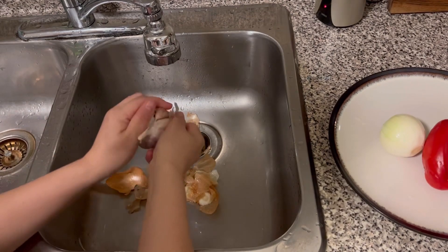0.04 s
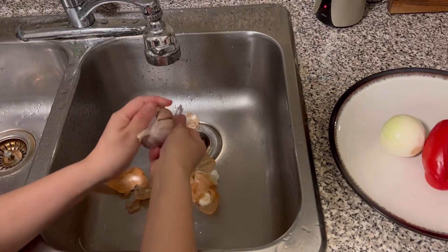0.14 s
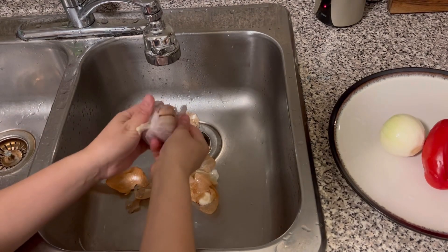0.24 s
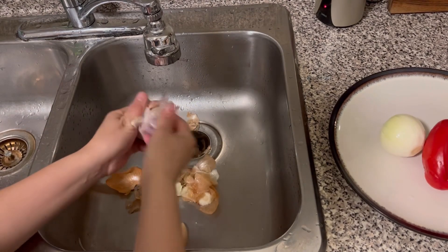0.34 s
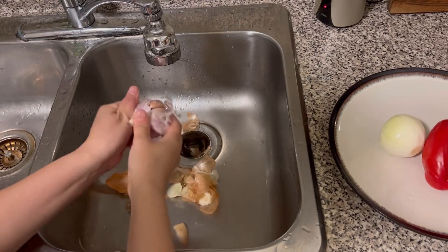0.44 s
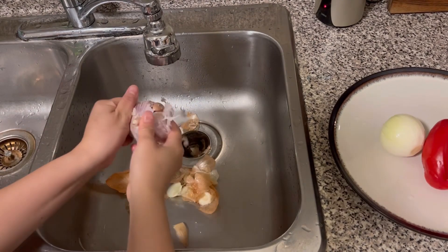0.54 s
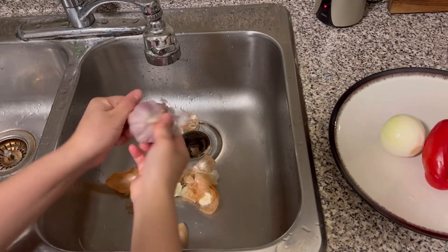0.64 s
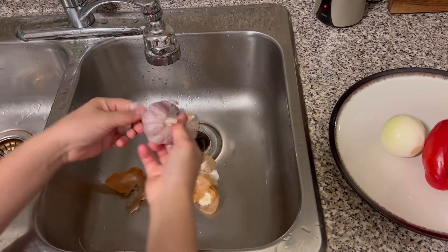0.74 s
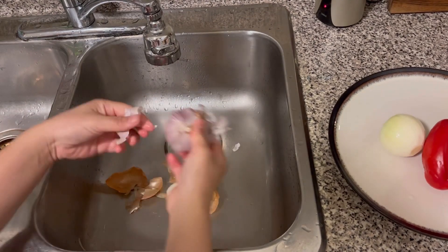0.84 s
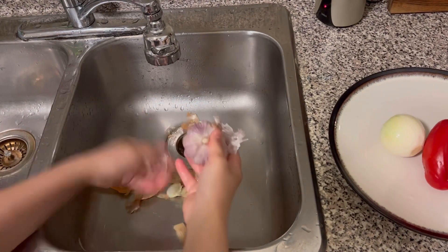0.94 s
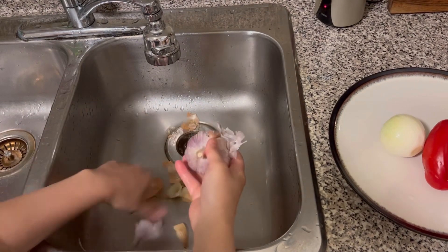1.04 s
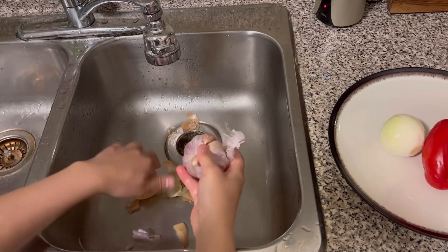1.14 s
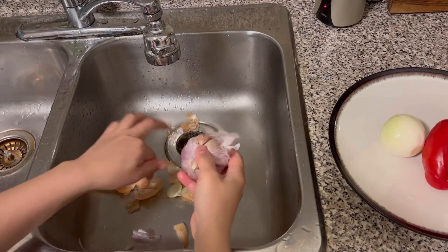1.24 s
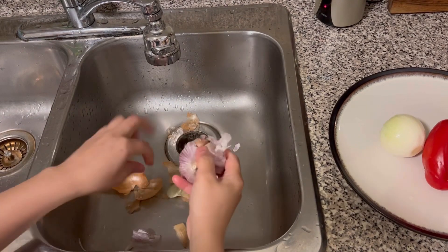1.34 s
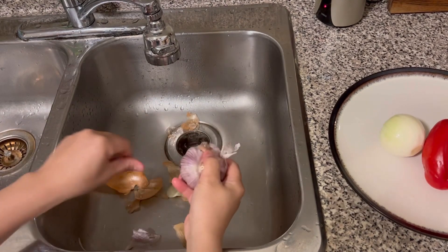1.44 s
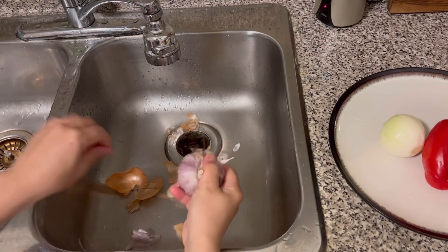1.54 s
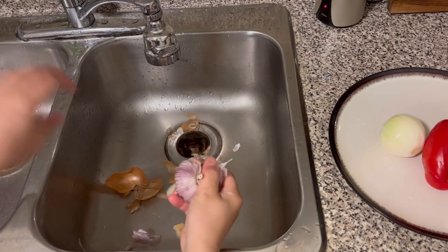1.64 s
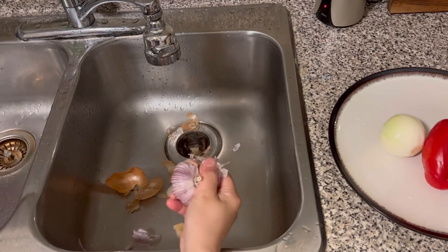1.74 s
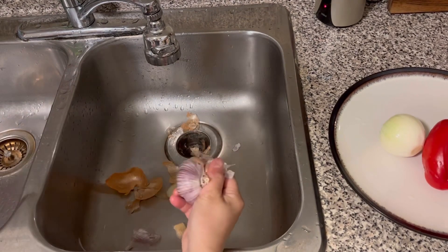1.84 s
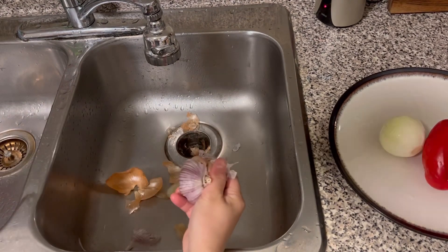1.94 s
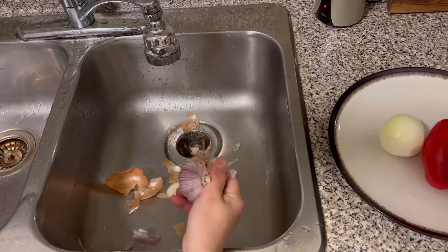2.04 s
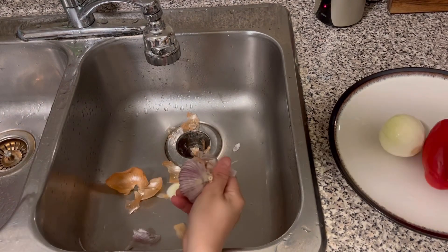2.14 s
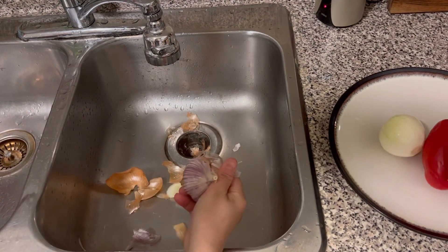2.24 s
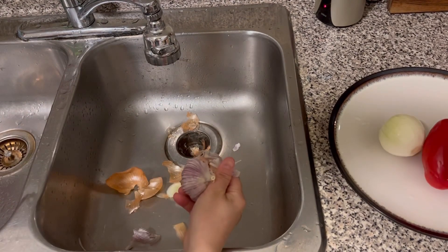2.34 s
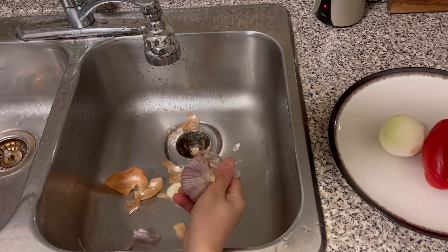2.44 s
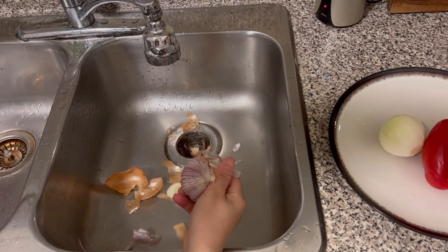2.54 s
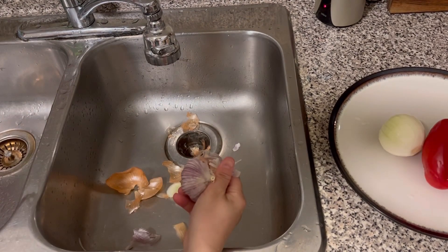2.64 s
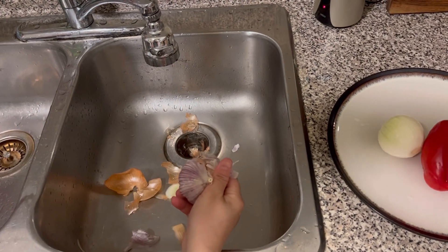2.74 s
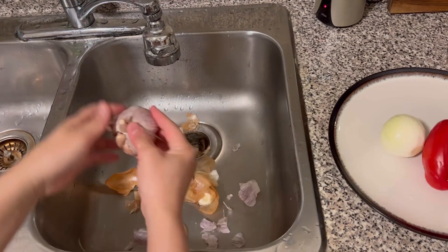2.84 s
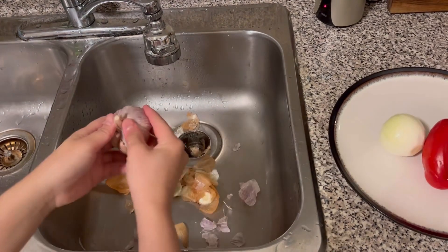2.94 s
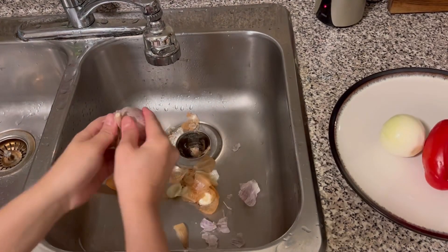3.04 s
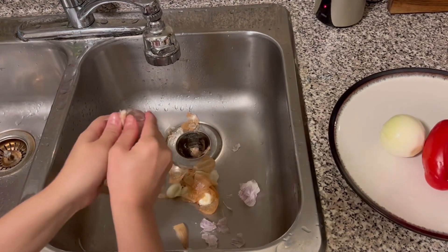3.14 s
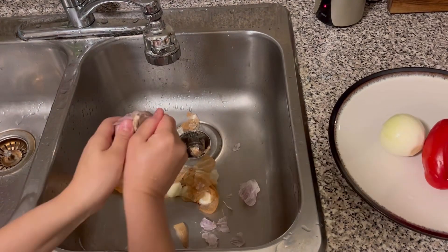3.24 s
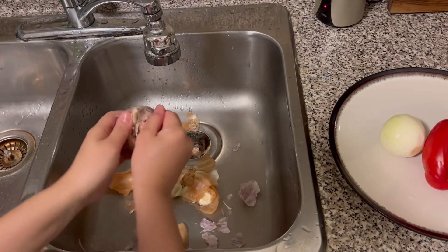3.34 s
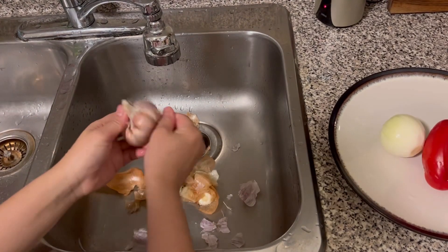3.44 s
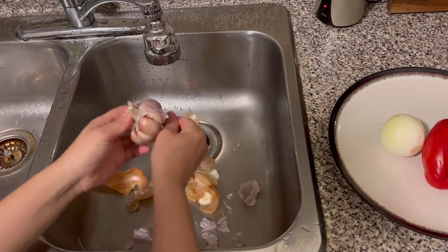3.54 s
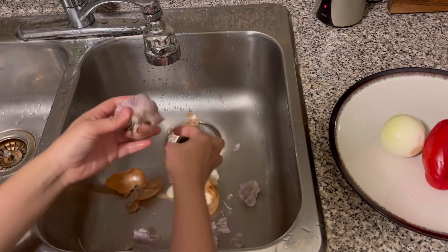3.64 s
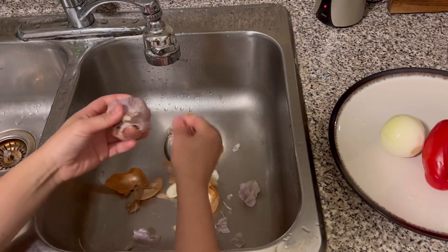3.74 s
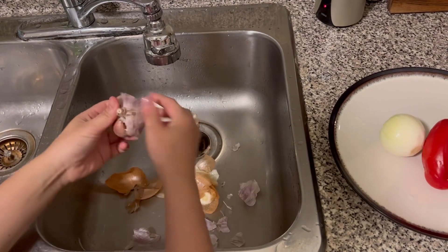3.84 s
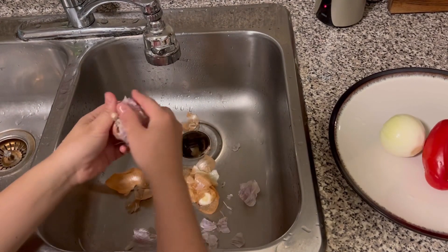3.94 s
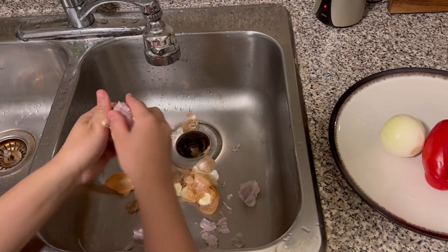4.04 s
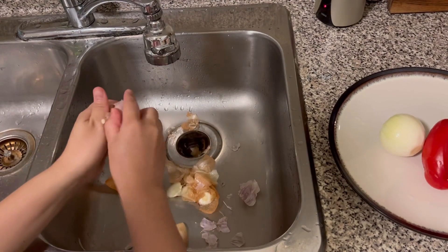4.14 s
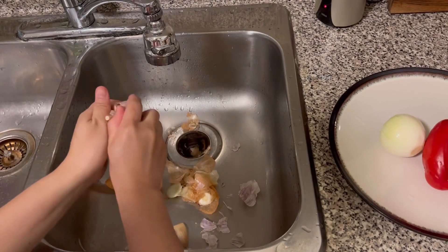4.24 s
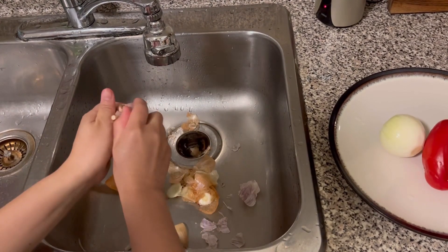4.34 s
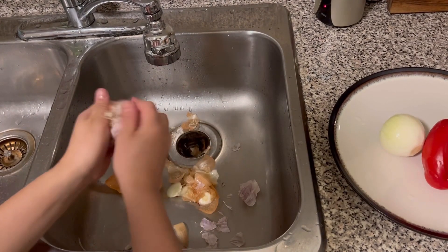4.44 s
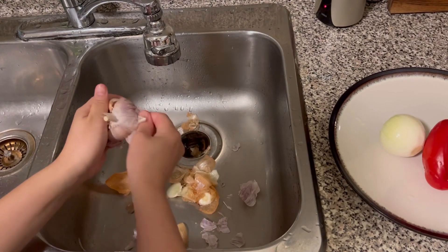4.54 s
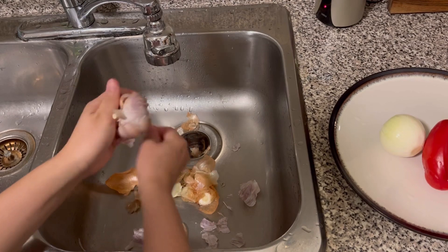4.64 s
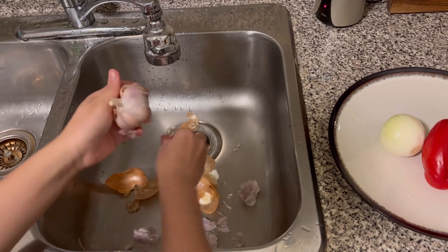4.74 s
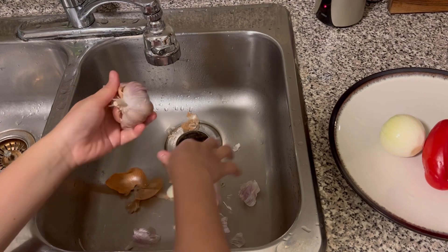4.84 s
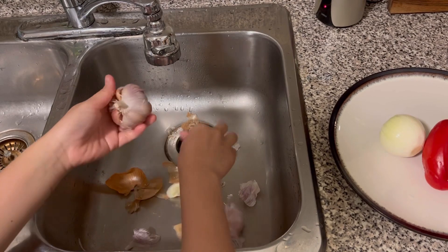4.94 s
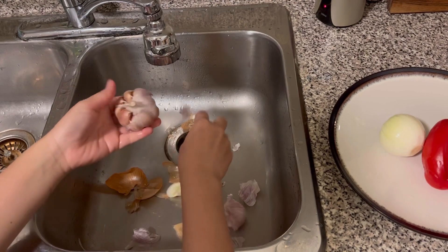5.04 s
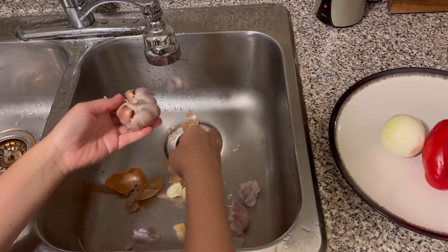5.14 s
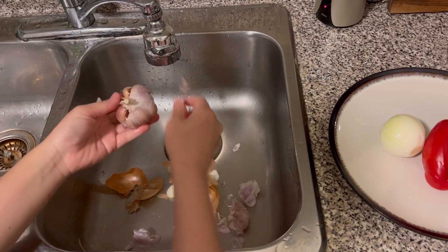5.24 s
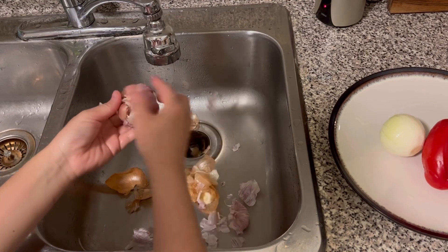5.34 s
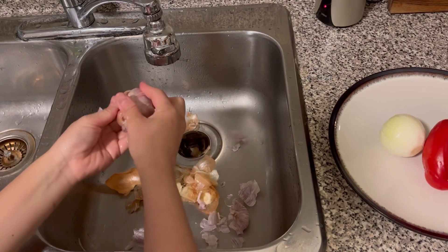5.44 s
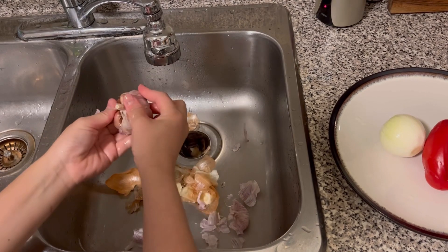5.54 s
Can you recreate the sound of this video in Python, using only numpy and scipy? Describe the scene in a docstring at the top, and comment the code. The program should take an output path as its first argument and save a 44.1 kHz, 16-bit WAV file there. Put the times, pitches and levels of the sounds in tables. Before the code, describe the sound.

Close, crisp rustling and brittle snapping of garlic skins being peeled by hand, pausing briefly midway, above a faint low kitchen hum.

```python
"""Dry garlic skins are rubbed, torn and snapped by hand over a steel kitchen sink, close to a two-port microphone.
From the start an appliance hums as tones and noise in the room's low resonances, under a rustle of shaped crackle.
Snaps are short noise bursts, tears swells of dense crackle; damped sines make the pops and the bulb's dull knocks.
The sink and kitchen answer with decaying noise tails. Near the middle a soft low bump rings, then the level dips
for an instant; rubbing, snaps, tears, pops and knocks go on to the end."""
import sys
import numpy as np
from scipy import signal
from scipy.fft import rfft, irfft, next_fast_len
from scipy.io import wavfile
from scipy.ndimage import uniform_filter1d, map_coordinates

SR = 44100
rng = np.random.default_rng(int(sys.argv[2]) if len(sys.argv) > 2 else 0)


def unload_audio(sound):
    """Save the sound as a 16-bit wav file, at the path given as the first command line argument."""
    columns = np.transpose(np.atleast_2d(sound))
    # keep every value between -1 and 1, then stretch to whole-number steps
    steps = np.round(np.clip(columns, -1, 1) * 32767)
    wavfile.write(sys.argv[1], SR, steps.astype(np.int16))


N = 246959

# Source levels are those ahead of the skin colour, the room and the ports.
# room rumble, common to both ports and opposed: each (frequency [Hz], relative level [dB])
RUMBLE_COMMON = [(15, -32.5), (25, -3.5), (98, -3.5), (146, -14.5), (181, -9.5), (286, -7.5), (344, -10),
                 (438, -8.5), (475, -15), (588, -15.5), (655, -21), (1000, -21.5), (1300, -24.5),
                 (1580, -35.5), (15000, -83.5)]
RUMBLE_OPPOSED = [(15, -67.5), (25, -29), (146, -9.5), (176, -2), (207, -19.5), (271, -2), (438, -11),
                  (501, -8.5), (588, -2), (637, -15.5), (1210, -13), (1720, -33), (15000, -72)]
# room resonances: (frequency [Hz], width [Hz], common level [dB], opposed level [dB])
ROOM_MODES = [(59.5, 8.2, -53, -75), (94.9, 4, -57.5, -84), (180.6, 26, -57, -73.5), (229, 16, -58, -85.5),
              (296, 22, -64.5, -68.5), (365.6, 6.3, -62, -71), (450, 44, -65, -67.5)]
# slow level change of the two lowest resonances: (time [s], lowest [dB], second lowest [dB])
LOWEST_MODES = [(0, -8, 4.5), (.8, -8, -3.5), (1.4, 6.5, 0), (2.1, -4.5, -1), (3.0, -1, 3.5), (4.8, 0.5, 5),
                (5.6, 1.5, -4)]
# appliance tones: (frequency [Hz], common level [dB], opposed level [dB])
MOTOR_TONES = [(179.5, -51, -75.5), (571, -76, -60), (1190.4, -63.5, -77)]
# how the fingers rub: (time [s], level [dB], brightness [dB])
RUBBING = [(0, -43.5, -2), (.5, -37.5, 1.5), (.68, -52, 0), (.77, -41, 4), (.835, -57, -3),
           (.88, -51, -3.5), (.935, -51.5, 1), (1.0, -63, 11), (1.07, -57, 3.5), (1.13, -44, -1),
           (1.18, -51.5, -4), (1.3, -40.5, 2.5), (1.5, -42, 1), (1.72, -43.5, -3), (1.82, -42, 3.5),
           (1.9, -55.5, -1.5), (2.0, -47, -2.5), (2.25, -59.5, -2.5), (2.45, -72, -2), (2.82, -88.5, 3),
           (2.89, -54, 0.5), (3.02, -48.5, -2.5), (3.15, -57.5, 4.5), (3.33, -61, 0.5), (3.55, -51.5, -2),
           (3.72, -67, 0), (4.01, -59.5, 1), (4.035, -46.5, 1.5), (4.27, -44.5, 0.5), (4.33, -67, 1),
           (4.55, -39.5, -2.5), (4.68, -72, 4), (5.0, -62.5, -0.5), (5.1, -68.5, -2), (5.33, -88, 1),
           (5.38, -61, 0), (5.6, -57, 3)]
# snaps of skin: (time [s], level [dB], brightness [dB], run-on of the tear [dB])
SKIN_SNAPS = [(.004, -24, -7, -5), (0.013, -23, -8, -22), (.0767, -29, -2, -4), (.172, -39, -11, -13),
              (0.225, -31, 0, -2), (.2783, -29.5, -2, -2), (.314, -31, -12, -6), (0.4183, -27, 2, -6.5),
              (0.5598, -24, -4, -2.5), (0.5885, -17, 12, -4), (0.62, -30, -2.5, -13.5),
              (0.643, -21, 7, -15), (0.6565, -24, 9, -27), (0.6793, -25.5, 11, -10),
              (0.724, -26, 2.5, -0.5), (0.7675, -28, -21, -13), (0.8554, -28, -8, -4), (0.8938, -36, 4, -9),
              (.955, -34, -20, -3.5), (.965, -26.5, -15, -7), (1.084, -39, 6, -5),
              (1.117, -25.5, -2.2, -9.5), (1.2318, -30, 5, -3), (1.304, -26, -4, -7),
              (1.3364, -21.5, -6.5, -6.5), (1.3654, -22.5, -13, -1.5), (1.4115, -8.5, 0.5, -13),
              (1.494, -20.5, -21, -2.5), (1.507, -20, -1, -5), (1.5296, -7, 0.5, -9.5),
              (1.544, -6.5, -3.5, -7), (1.5853, -22, -5, -1.5), (1.624, -9.5, -1.5, -12.5),
              (1.6816, -27, -2, -9), (1.731, -23, -2.5, -9.5), (1.775, -31, -3, -11.5),
              (1.7971, -20.5, -14, -15), (1.803, -18.5, -5.5, -9), (1.931, -42, -2, -0.5),
              (2.017, -27.5, 3, -14), (2.064, -33, 5, -20), (2.0797, -27.5, -0.5, -5.5),
              (2.134, -32, 12, -30), (2.221, -35.5, -4, -9), (2.268, -29.5, 11, -15),
              (2.292, -30.5, -1.5, -8), (2.368, -42.5, -7, -3.5), (2.4582, -32, -4, -12.5),
              (2.536, -38.5, -5.5, -5), (2.704, -59.5, -0.5, -12), (2.8627, -45.5, 9.5, -17),
              (2.8777, -33.5, 3, -4.5), (2.946, -37.5, 2, -12), (2.982, -40, -9, -12.5),
              (3.057, -33, 3, -1.5), (3.08, -24.5, 33, -11), (3.115, -30.5, 0, -8), (3.138, -33, -1, -4.5),
              (3.153, -38, 6, -16), (3.1803, -12.5, 4, 0.5), (3.1863, -16, -6, -6.5), (3.204, -25, 2, -8),
              (3.243, -24.5, -8, -11), (3.346, -30, 9, -12.5), (3.392, -34.5, 21, -6),
              (3.4452, -19, 4.5, -1.5), (3.562, -30, 18, -21), (3.586, -30, -3, 0.5),
              (3.6548, -22, 9.5, -15), (3.7297, -45.5, -9, -3.5), (3.781, -34, 1, -3), (3.826, -35, -1, -8),
              (3.84, -35.5, -1, 0), (3.89, -38, 5, -13), (4.0263, -31.5, 9, -10), (4.084, -41, 0, -4.5),
              (4.0986, -36, -2, -3.5), (4.154, -31, 12, -6), (4.1984, -39, 2, -8.5), (4.314, -25.5, 29, -7),
              (4.3564, -19.5, 26, -11), (4.3894, -33, -17, 6.5), (4.4348, -20, 1, -5),
              (4.451, -15, 2, -5.5), (4.4623, -16.5, -8, -11), (4.474, -20, -5, -5.5),
              (4.563, -26, -5.5, -2.5), (4.714, -42, 0, -12), (4.726, -32, 0, 0), (4.7522, -14, 17, -8),
              (4.787, -26, 9, -3), (4.8245, -25.5, 1.5, -1), (4.831, -35, 7, -11), (4.8992, -35.5, 6, -5),
              (4.935, -33.5, -10, 0.5), (5.006, -44, 11, 7), (5.157, -46.5, 1, -5), (5.203, -51, -3, -12),
              (5.3614, -39, -3.5, -5), (5.378, -30, -0.5, -7.5), (5.4973, -22, -4, 3), (5.59, -28, 12, -18)]
# longer tears that swell: (time of the crest [s], crest level [dB], rise [s], fall [s], body [dB])
LONG_TEARS = [(0.008, -29, 0.058, 0.03, 4), (0.126, -35, 0.058, 0.013, 5), (0.23, -36.5, 0.021, 0.031, 5),
              (.295, -31.5, 0.036, 0.054, 5.5), (.44, -33.5, 0.044, 0.037, 5),
              (.52, -37.5, 0.024, 0.027, 7), (0.641, -33.5, 0.035, 0.023, 12),
              (0.991, -45.5, 0.02, 0.036, 16), (1.23, -41, 0.026, 0.023, 10),
              (1.37, -36, 0.008, 0.012, 11.5), (1.55, -32, 0.036, 0.064, 3.5),
              (1.803, -36, 0.0088, 0.012, -11), (2.09, -51.5, 0.1, 0.025, -1.5),
              (3.201, -34.5, 0.0068, 0.043, 12.5), (3.44, -40.5, 0.028, 0.042, 4),
              (3.6, -42.5, 0.011, 0.038, -2.5), (3.901, -46.5, 0.011, 0.04, 7.5),
              (4.23, -41, 0.029, 0.04, -1.5), (4.442, -33, 0.042, 0.02, 2), (4.464, -20.5, 0.015, 0.02, 2),
              (4.58, -38, 0.013, 0.048, 1), (4.765, -37.5, 0.056, 0.041, 1.5),
              (4.95, -50, 0.016, 0.029, 9.5), (5.47, -48.5, 0.035, 0.013, 0)]
# colour of the dry skin: (frequency [Hz], gain [dB])
SKIN_COLOUR = [(600, -23), (900, -17), (1450, -11), (1620, -11), (1800, -7.5), (2050, -5), (2300, -6.5),
               (2900, -3.5), (3700, -1.5), (4700, -2), (6500, 1), (9000, 4.5), (12000, 0.5), (15500, -2)]
# pitched pops of a stiff flake buckling: (time [s], level before POP_DB [dB], pitch [Hz])
FLAKE_POPS = [(0.171, -33, 2070), (0.2234, -32, 2190), (0.5596, -27, 2130), (0.617, -25.5, 1840),
              (0.7253, -24.5, 2560), (1.2171, -40, 2320), (1.2281, -38, 2300), (1.3639, -22.5, 2380),
              (1.4937, -33, 1850), (1.5299, -19.5, 2460), (1.5445, -17, 2720), (1.729, -36, 1850),
              (1.7744, -33, 2380), (1.7953, -31.5, 2260), (1.8207, -32, 2720), (1.8454, -46, 2290),
              (1.8801, -46, 2280), (1.9228, -42, 2540), (1.932, -40, 2300), (1.9669, -42, 2260),
              (1.9952, -42, 1896), (2.0168, -37, 2350), (2.0627, -34.5, 2340), (2.3654, -53, 2290),
              (2.5356, -38, 1960), (2.9837, -39.5, 1920), (3.1817, -22.5, 2000), (3.1914, -21.5, 1930),
              (3.205, -27, 1790), (3.446, -27.5, 2880), (3.844, -37, 1770), (3.895, -52, 1740),
              (3.915, -50, 1770), (4.08, -43.5, 1730), (4.0976, -35, 2440), (4.392, -36.5, 1850),
              (4.7134, -42, 2680), (4.7635, -27, 2800)]
# dull knocks of the bulb against the fingers:
# (time [s], level [dB], brightness [dB per octave about 330 Hz], decay constant of the patter [s])
BULB_KNOCKS = [(0.309, -41, 14, 0.018), (0.62, -38.5, 3.5, .01), (0.987, -40, 10.5, 0.017),
               (1.625, -28.5, -3.5, 0.0037), (1.881, -42, -0.5, .002), (3.1816, -24.5, 4, 0.0026),
               (3.187, -29, -1, .005), (3.442, -37, 5.5, 0.0037), (4.456, -37.5, 7, .018),
               (5.498, -32, 4.5, 0.0017)]
# modes of the bulb: (frequency before detuning [Hz], width [Hz], level before brightness [dB])
BULB_MODES = [(120, 290, -20), (386, 1170, 21.5), (870, 780, 7.5), (1250, 770, -6)]
# one soft low bump: (time [s], level before a 6 dB lift [dB], pitch [Hz], t60 [s])
LOW_BUMP = (2.717, -39, 275, 0.06)
# decay of the sink and kitchen: (frequency [Hz], t60 [s])
KITCHEN_DECAY = [(500, 0.38), (2000, 0.23), (5000, 0.21), (10000, 0.12), (16000, 0.23)]
# resonances of the steel basin: (frequency [Hz], width [Hz], level [dB])
BASIN_MODES = [(1760, 25, -5.5), (2380, 60, -10), (2840, 46, -12), (4664, 110, -5), (5480, 41, -19)]
# how the two ports differ: (frequency [Hz], phase lead of the right [rad], likeness [0-1], left over right [dB])
PORT_PAIR = [(500, -.8, .4, 1.5), (1300, -.3, .4, 1), (2000, -.25, .92, 1), (3300, -1.2, .6, 3.5),
             (4800, -.6, .55, 5), (6000, .9, .65, 2), (7000, 1.9, .72, 1), (7750, 3.12, .99, 0),
             (8900, 3.16, .99, 0), (10000, 4.6, .75, 0), (11100, 6.26, .99, 0), (12800, 6.3, .99, 0),
             (13800, 7.8, .55, -1), (14700, 9.41, .99, 0), (16500, 9.43, .99, 0)]
# brief drop in level: (time [s], time to come back [s], depth [dB])
LEVEL_DIP = (2.835, .011, -22)

LEANS_HZ = 120  # lower resonances are louder on the right, higher ones on the left
WAVER_DB, WAVER_RATE = 1.2, 3  # wavering of the resonances: depth [dB], speed [knots per second]
RUB_BODY_DB, RUB_TREBLE_DB = 3.5, -2  # mean colour of the rustle [dB]
DRIFT_DB = 1.2  # how far the colour of the rustle drifts [dB]
SETTLE_DB, SETTLE_S = -17.5, 0.14  # a snapped flake rustles on: level under its tear [dB], t60 [s]
# it creaks before it gives: level under its tear [dB], time to grow 60 dB [s], loudest tear that counts [dB]
STRAIN_DB, STRAIN_S, STRAIN_TOP_DB = -15, 0.034, -25
POP_T60, POP_DB = 0.009, 1.5  # pops: ring time [s], gain [dB]
DETUNE = .08  # the bulb's modes shift with the grip [share of the pitch]
TOP_HZ = 15850  # band limit [Hz]


def amp(db):
    """Decibels to gain."""
    return 10 ** (np.asarray(db) / 20)


def unit(x):
    """Scaled to rms 1."""
    return x / np.sqrt(np.mean(x ** 2) + 1e-20)


def along(points, hz, order=1):
    """One column of a (frequency [Hz], ..) table, read on a log axis."""
    cols = np.transpose(points)
    return np.interp(np.log(hz + 1), np.log(cols[0] + 1), cols[order])


def curves(rows):
    """One value per sample for each column after the time."""
    s, *cols = np.transpose(rows)
    return [np.interp(np.arange(N) / SR, s, c) for c in cols]


def wobble(rate):
    """A smooth random curve, rate knots a second."""
    knots = rng.standard_normal(int(N * rate / SR) + 4)
    return map_coordinates(knots, [np.arange(N) * rate / SR])


def filtered(x, response):
    """x through a complex response of frequency."""
    m = next_fast_len(N + SR // 2)
    return irfft(rfft(x, m) * response(np.fft.rfftfreq(m, 1 / SR)), m)[..., :N]


def fading(x, t60):
    """Every sample leaves an exponential tail."""
    return signal.lfilter([1], [1, -amp(-60 / (t60 * SR))], x)


def tilted(pair, body_db, treble_db):
    """Separate gains under 3.5 kHz and over 7.5 kHz."""
    low = filtered(pair, lambda hz: 1 / (1 + (hz / 3500) ** 4))
    high = filtered(pair, lambda hz: 1 / (1 + (7500 / (hz + 1)) ** 6))
    return pair + (amp(body_db) - 1) * low + (amp(treble_db) - 1) * high


def hum():
    """Broad rumble, wavering noise in each room resonance, and appliance tones that waver in level and phase."""
    noise = rng.standard_normal((2, N))
    broad = filtered(noise, lambda hz: amp([along(RUMBLE_COMMON, hz), along(RUMBLE_OPPOSED, hz)]))
    common_opposed = np.array([amp(-50.5) * unit(broad[0]), amp(-54) * unit(broad[1])])

    slow_db = curves(LOWEST_MODES) + [0] * (len(ROOM_MODES) - 2)
    for level_db, (centre, width, common_db, opposed_db) in zip(slow_db, ROOM_MODES):
        noise = rng.standard_normal(N)
        tone = unit(filtered(noise, lambda hz: 1 / (1 + (2 * (hz - centre) / width) ** 2)))
        # the drive is steady, so slow swings of the noise are evened out
        power = np.abs(uniform_filter1d(tone ** 2, size=SR // 4))
        tone = unit(tone / np.sqrt(power + .1))
        swell_db = level_db + WAVER_DB * wobble(WAVER_RATE)
        lean = [[1], [np.sign(centre - LEANS_HZ)]]
        common_opposed += amp([[common_db], [opposed_db]]) * lean * amp(swell_db) * tone

    for hz, common_db, opposed_db in MOTOR_TONES:
        waver = amp(0.96 * wobble(9.3) + 1.5 * wobble(1.2))
        phase = 2 * np.pi * hz * np.arange(N) / SR + 0.68 * wobble(4.0) + 0.6 * wobble(25)
        common_opposed += amp([[common_db], [opposed_db]]) * waver * np.sin(phase)

    common, opposed = common_opposed
    return np.array([common + opposed, common - opposed])


def crackle(density, spike_db, patchy_db):
    """Clumps of tiny cracks over a scrape of skin on skin; one draw for what the ports share, one for what differs."""
    clump = amp(1.3 * wobble(45) + 3 * wobble(220))
    struck = rng.random(N) < density / SR * clump  # density: cracks a second where clump is 1
    cracks = struck * amp(spike_db * np.minimum(rng.exponential(size=N), 3))
    grain = unit(np.sqrt(fading(cracks ** 2, 0.004))) + 1.4 * clump
    z = signal.stft(unit(grain) * rng.standard_normal((2, N)), nperseg=256)[2]
    # each crinkle favours its own band, about 700 Hz wide, for some 30 ms
    field = uniform_filter1d(rng.standard_normal(z.shape[1:]), size=4, axis=0)
    field = uniform_filter1d(field, size=10, axis=1)
    return unit(signal.istft(z * amp(patchy_db * unit(field)), nperseg=256)[1][:, :N])


def rubbing():
    """Fingers keep the skins rustling; the rustle swells into each snap and settles after it as its colour drifts."""
    level_db, bright_db = curves(RUBBING)
    s, db, _, run_db = np.transpose(SKIN_SNAPS)
    stirred = np.bincount(np.round(s * SR).astype(int), amp(db + run_db), minlength=N)[:N]
    settle = amp(SETTLE_DB) * fading(stirred, SETTLE_S)
    # a tail run backwards in time grows towards the snap
    strained = np.minimum(stirred, amp(STRAIN_TOP_DB))
    creak = amp(STRAIN_DB) * fading(strained[::-1], STRAIN_S)[::-1]
    skin = crackle(density=700, spike_db=3.5, patchy_db=2.6)
    body_db = RUB_BODY_DB - bright_db + DRIFT_DB * wobble(30)
    treble_db = RUB_TREBLE_DB + bright_db + DRIFT_DB * wobble(30)
    return (amp(level_db) + settle + creak) * tilted(skin, body_db, treble_db)


def snaps():
    """A sharp break, then the tear runs on as a dying burst; each has its own colour."""
    t = np.arange(SR // 16) / SR
    hz = np.fft.rfftfreq(len(t), 1 / SR)
    skin = np.zeros((2, N + len(t)))
    for s, db, bright_db, run_db in SKIN_SNAPS:
        draw = rng.standard_normal((3, len(t)))
        crack = amp(-3.0) * np.exp(-((t - .0011) / 0.00042) ** 2)
        # the run-on is ragged from sample to sample
        run_on = amp(run_db - 60 * t / 0.037 + 4.66 * draw[2]) * np.minimum(t / 0.005, 1)
        colour_db = [-7.5 - bright_db, -2.0 - bright_db, -5.0 - bright_db, 0, 0, -1.0 + bright_db]
        colour = np.interp(hz, [1100, 1700, 2510, 4490, 6400, 9000], colour_db)
        colour += 3 * np.interp(hz, np.arange(24) * 750, draw[2, -24:])  # each flake has its own bumps
        noise = unit(irfft(rfft(draw[:2]) * amp(colour), len(t)))
        skin[:, round(s * SR):][:, :len(t)] += amp(db) * (crack + run_on) * noise
    return skin[:, :N]


def tears():
    """Dense crackle that swells as a sheet is pulled and thins as it comes off."""
    t = np.arange(N) / SR
    level, weighted_body = np.zeros(N), np.zeros(N)
    for s, db, rise, fall, body_db in LONG_TEARS:
        swell = amp(db) * np.exp(-((t - s) / np.where(t < s, rise, fall)) ** 2)
        level += swell
        weighted_body += swell * body_db
    skin = crackle(density=2200, spike_db=8.0, patchy_db=3.0)
    return level * tilted(skin, weighted_body / (level + 1e-9), wobble(27))


def pops():
    """A stiff flake buckles: each pop is one short damped ring."""
    out, t = np.zeros(N + SR), np.arange(SR // 20) / SR
    for s, db, hz in FLAKE_POPS:
        envelope = amp(db + POP_DB - 60 * t / POP_T60) * (1 - np.exp(-t / 0.00035))
        out[round(s * SR):][:len(t)] += envelope * np.sin(2 * np.pi * hz * t)
    return out[:N]


def knocks():
    """Each soft blow, a patter of small contacts, rings the bulb's damped modes; bright ones favour the upper modes."""
    out, t = np.zeros(N + SR), np.arange(SR // 16) / SR
    for s, db, bright_db, spread in BULB_KNOCKS:
        force = np.abs(rng.standard_normal(len(t))) ** 3
        direction = np.sign(np.cos(900 * t + rng.standard_normal(len(t))))
        patter = force * direction * np.exp(-t / spread)
        ring = np.zeros(len(t))
        for hz, width, mode_db in BULB_MODES:
            level = amp(mode_db + bright_db * np.log2(hz / 330) - 60 * t / 0.2)
            envelope = level * (1 - np.exp(-t / 0.0011)) * np.exp(-np.pi * width * t)
            pitch = hz * (1 + DETUNE * rng.standard_normal())
            ring += envelope * np.sin(2 * np.pi * pitch * t)
        blow = signal.fftconvolve(patter / np.linalg.norm(patter), ring)[:len(t)]
        out[round(s * SR):][:len(t)] += amp(db) * blow
    return out[:N]


def bump():
    """A muffled low ring that swells over a few cycles and dies away."""
    s, db, hz, t60 = LOW_BUMP
    t = np.maximum(np.arange(N) / SR - s, 0)
    return amp(db + 6 - 60 * t / t60) * (1 - np.exp(-t / 0.005)) * np.sin(2 * np.pi * hz * t)


def kitchen(pair):
    """Sink and walls answer, each frequency dying at its own speed; a fresh tail every third of a second."""
    out, step = np.zeros((2, N + SR)), SR // 3
    for start in range(0, N, step):
        hz, t, z = signal.stft(rng.standard_normal((2, SR // 2)), SR, nperseg=128)
        decay = amp(-60 * t / along(KITCHEN_DECAY, hz)[:, None])
        tail = signal.istft(z * decay, SR, nperseg=128)[1]
        wet = signal.fftconvolve(pair[:, start:start + step], tail / np.linalg.norm(tail[0]), axes=1)
        out[:, start + 60:][:, :wet.shape[1]] += wet  # the answer comes 60 samples late
    return out[:, :N]


def basin(f):
    """Response of the open path plus what the steel basin's resonances add."""
    return 1 + sum(amp(db) * 1j * f * w / (c * c - f * f + 1j * f * w) for c, w, db in BASIN_MODES)


def ports(pair):
    """The basin colours the sound; the two ports differ in level, phase and likeness at each frequency."""
    def mix(hz):
        # the angle sets how alike the two ports are
        turn = np.arccos(np.clip(along(PORT_PAIR, hz, order=2), 0, 1)) / 2
        return np.array([np.cos(turn), np.sin(turn)])

    def half(hz):
        # each port takes half of the level and phase difference
        return amp(along(PORT_PAIR, hz, order=3) / 2) * np.exp(-.5j * along(PORT_PAIR, hz))

    shared, unlike = filtered(pair, lambda hz: basin(hz) * mix(hz))
    left_right = np.array([shared + unlike, shared - unlike])
    return filtered(left_right, lambda hz: np.array([half(hz), 1 / half(hz)]))


def scene():
    """Skins and bulb, direct and through the kitchen, reach the ports over the hum and the bump."""
    skin = filtered(snaps() + rubbing() + tears(), lambda hz: amp(along(SKIN_COLOUR, hz)))
    # rows: what the ports share, what differs
    hands = skin + knocks() * [[1], [.5]] + pops() * [[1], [.3]]
    return ports(hands + amp(-5.5) * kitchen(hands)) + hum() + bump()


def record(dry):
    """The level drops at once and soon recovers; the deepest bass is cut and little is kept above the band limit."""
    (s, back, db), t = LEVEL_DIP, np.arange(N) / SR
    # full depth for half the return time, then back up
    dip = amp(db * (t > s) * np.clip(1.5 - (t - s) / back, 0, 1))
    edges_hz = [20, 36, TOP_HZ - 150, TOP_HZ + 200, 16700, 16850]
    return filtered(dry * dip, lambda hz: amp(np.interp(hz, edges_hz, [-10, 0, 0, -28, -36, -110])))


dry = scene()
out = record(dry)
unload_audio(out)
```